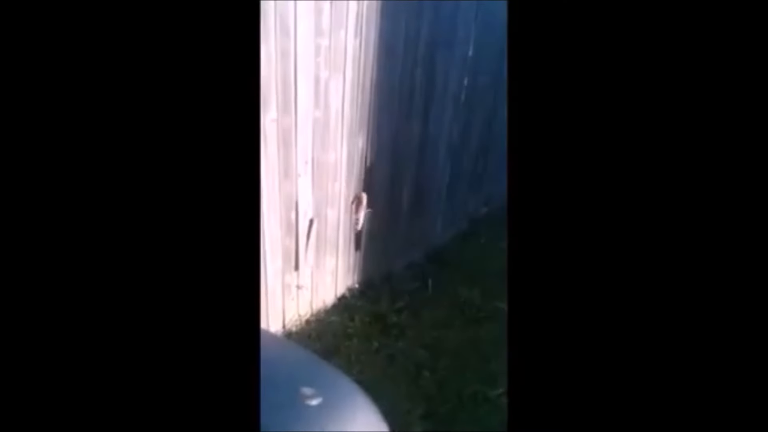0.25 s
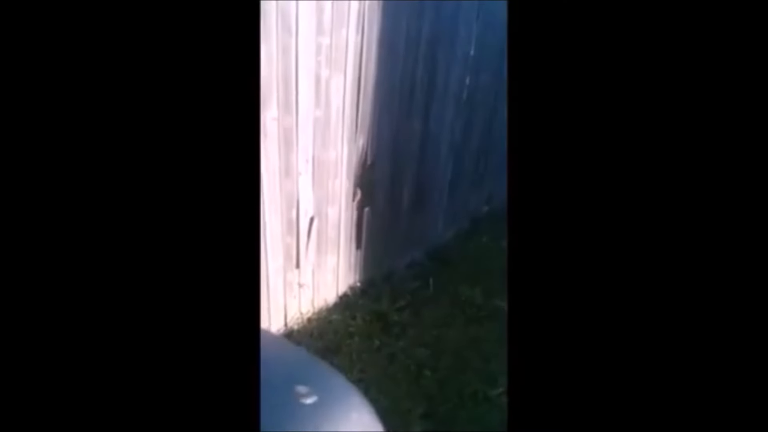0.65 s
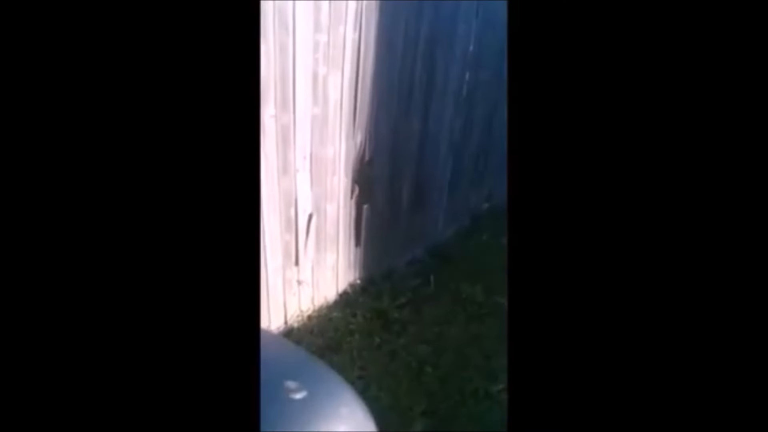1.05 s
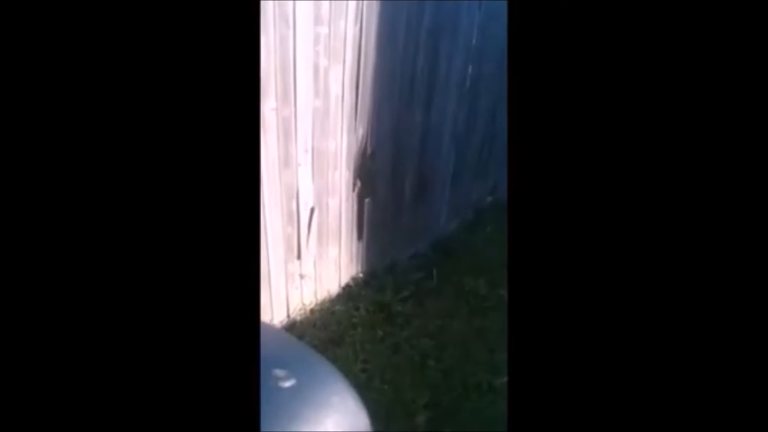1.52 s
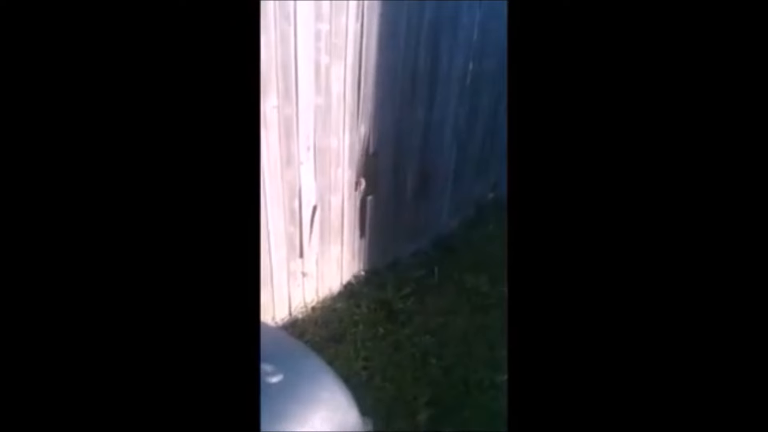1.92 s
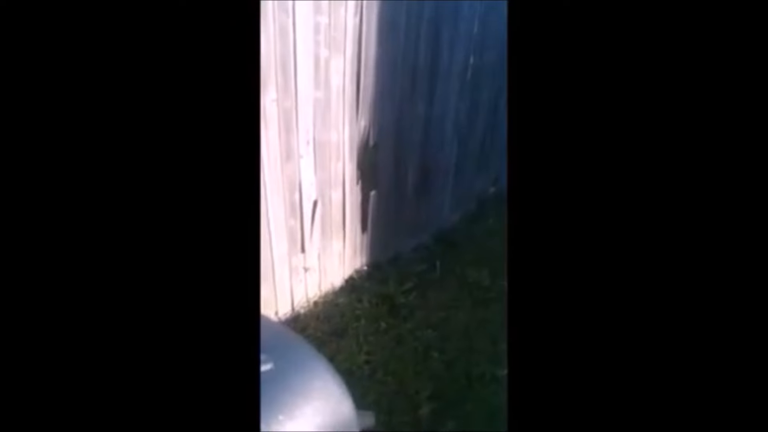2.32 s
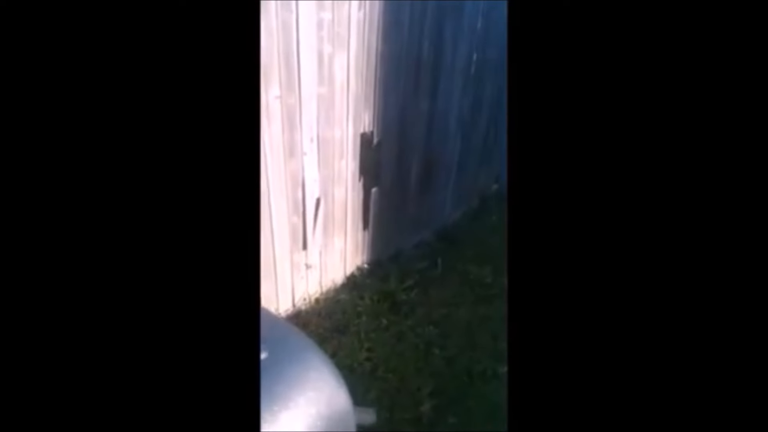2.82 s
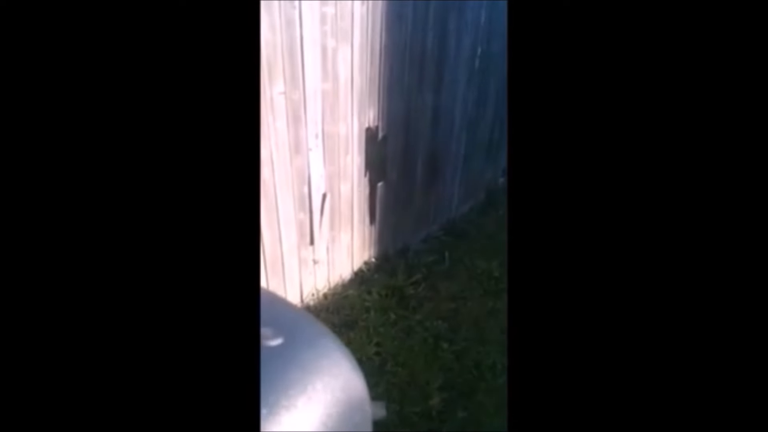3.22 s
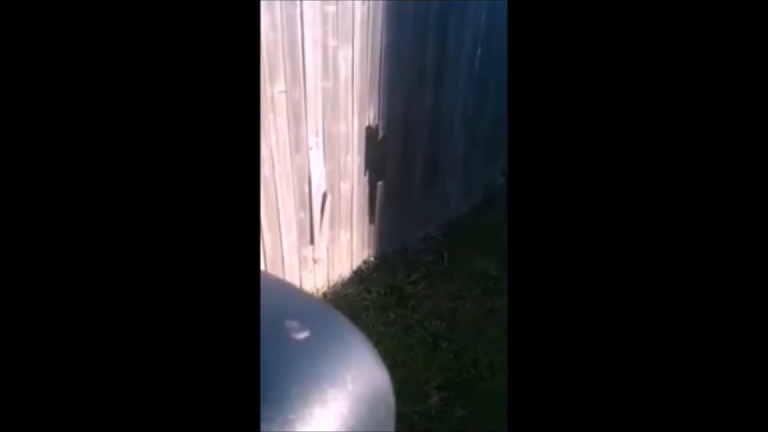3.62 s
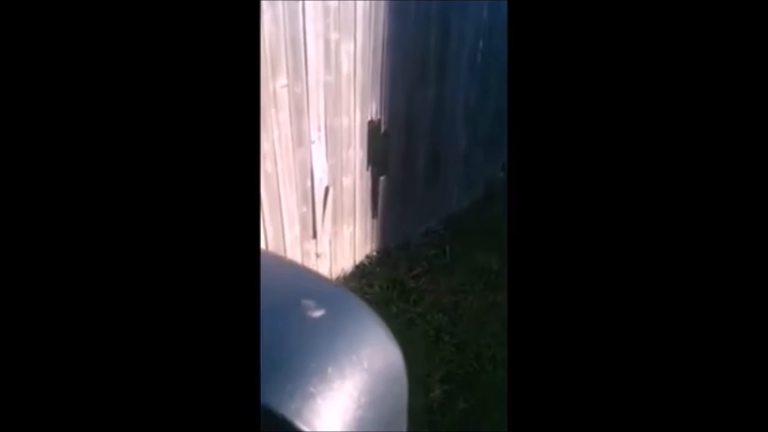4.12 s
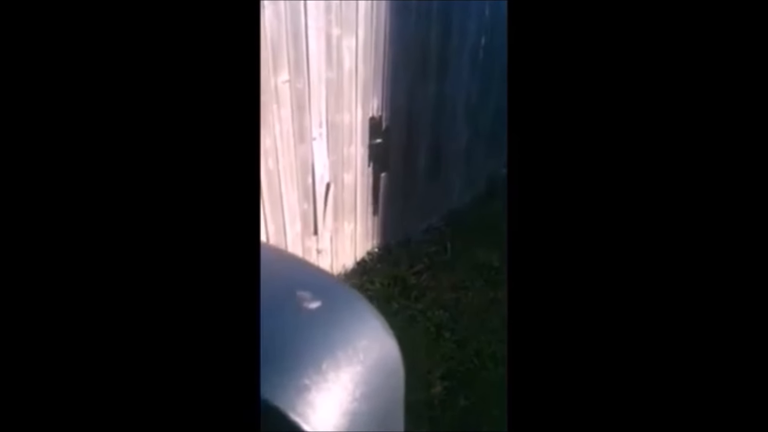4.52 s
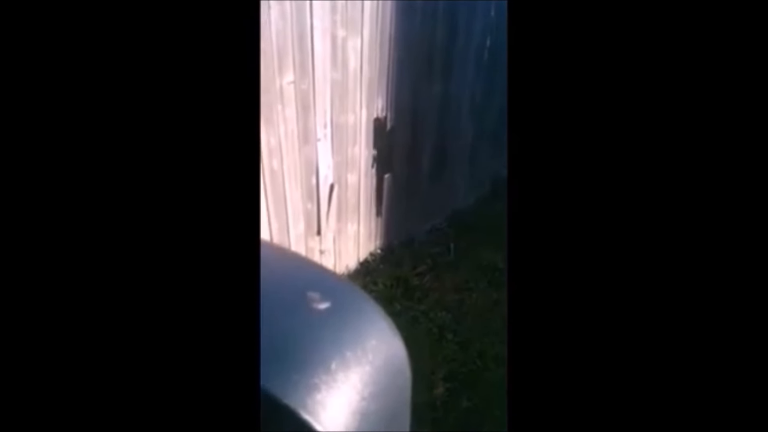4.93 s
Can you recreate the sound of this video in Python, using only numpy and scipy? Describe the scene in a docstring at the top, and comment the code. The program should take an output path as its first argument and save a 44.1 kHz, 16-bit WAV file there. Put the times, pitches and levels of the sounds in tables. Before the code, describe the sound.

A handheld microphone outdoors catches dull handling bumps, then a rapid burst of bright metal clicks on a ringing hollow body. Sparse taps lead to a heavier double knock and a sudden loud blast, like an air gun, with a short dense tail. Afterwards come low knocks, grainy metal slides, a lull and a final click with rustle, over steady dull hiss and faint rumble.

```python
"""Clicks, knocks and a bang in a yard

Beside a wooden fence, small metal parts click and scrape, and a hollow body is knocked about close by.
One loud bang, perhaps an air gun, is followed by more knocks. Each blow is a short burst of shaped noise.
Narrow filters make the hollow body ring, and a dense tail of fading noise follows each close sound.
Underneath are dull hiss, an uneven low rumble and one faint peep, a fading sine wave."""
import sys
import numpy as np
from scipy import signal
from scipy.fft import irfft
from scipy.io import wavfile

SR = 44100
rng = np.random.default_rng(int(sys.argv[2]) if len(sys.argv) > 2 else 0)


def output_pcm(signal):
    """Save a mono or channel-first signal as 16-bit PCM at the path in sys.argv[1].

    Samples are clipped to [-1, 1] before scaling.
    """
    pcm = np.clip(np.atleast_2d(signal).T, -1, 1) * 32767
    wavfile.write(sys.argv[1], SR, np.round(pcm).astype(np.int16))


N = 227464  # length in samples


def amp(db):
    """Turns decibels into a plain multiplier."""
    return 10 ** (np.asarray(db) / 20)


def evened(x):
    """Scales a sound to an average strength (RMS) of one."""
    return x / np.sqrt(np.mean(x ** 2) + 1e-20)


def read(points, hz):
    """Reads a (frequency, value) table between its points, on a log-frequency axis."""
    f, value = np.transpose(points)
    return np.interp(np.log(hz + 1), np.log(f + 1), value)


def level(rows):
    """Turns a (time, level) table into a multiplier for every sample."""
    return amp(np.interp(np.arange(N) / SR, *np.transpose(rows)))


def add(mix, s, sound):
    """Lays a sound into the mix at s seconds."""
    part = mix[max(round(s * SR), 0):][:len(sound)]
    part += sound[:len(part)]


def noise(colour, size):
    """Noise of unit strength: random phases, with the spectrum colour(Hz) in dB."""
    hz = np.fft.rfftfreq(size, 1 / SR)
    phases = np.exp(2j * np.pi * rng.random(len(hz)))
    return evened(irfft(amp(colour(hz)) * phases, size))


def lumps(rate_hz, size):
    """A random curve of unit strength that wanders mostly slower than rate_hz."""
    return noise(lambda f: -40 * np.log10(1 + (f / rate_hz) ** 2), size)


def uneven(spacing_hz, depth_db):
    """The random peaks and dips of a part with many crowded resonances: (frequency [Hz], level [dB])."""
    hz = np.arange(0, SR / 2, spacing_hz)
    return np.c_[hz, depth_db * rng.standard_normal(size=4096)[:len(hz)]]


def hump(hz, centre_hz, below, above, depth_db):
    """A bell-shaped colour with its own spread [octaves] on each side, levelling off far out."""
    octaves = np.log2((hz + 1) / centre_hz)
    spread = np.where(octaves < 0, below, above)
    drop_db = 10 / np.log(10) * (octaves / spread) ** 2
    return -depth_db * np.tanh(drop_db / depth_db)


def fade(x, ring, gain=((1, 0), (2, 0))):
    """Lets every band of x die at its own speed; t60 is the time to drop by 60 dB."""
    hz, t, z = signal.stft(x, SR, nperseg=256)
    fading_db = -60 * t / read(ring, hz)[:, None]
    z = z * amp(read(gain, hz)[:, None] + fading_db)
    return signal.istft(z, SR, nperseg=256)[1][:len(x)]


def blow(colour, rise, t60, chatter_db=0, size=16384):
    """Many resonances struck at once: noise that swells, then dies, chattering if the contact is loose."""
    t = np.arange(size) / SR
    envelope = np.minimum(t / rise, 1) * amp(-60 * np.maximum(t - rise, 0) / t60)
    chatter = amp(chatter_db * lumps(170.1, size))
    sound = noise(colour, size) * envelope * chatter
    return sound * np.linalg.norm(envelope) / np.linalg.norm(sound)  # chatter keeps the total energy


# colour of the background hiss: (frequency [Hz], relative level per Hz [dB])
HISS_COLOUR = [(100, -11), (200, -0.5), (340, -0.5), (430, -5.5), (520, -13.5), (650, 1), (770, -10.5),
               (950, -4), (1400, -8.5), (1850, -11.5), (2450, -32.5), (3200, -43), (6000, -34.5),
               (15000, -60)]
# rise and fall of the hiss: (time [s], relative level [dB])
HISS_LEVEL = [(0, -51), (.9, -47.5), (1.2, -53), (1.8, -49), (3.5, -47.5), (3.9, -52), (5.15, -46.5)]
# colour of the low rumble: (frequency [Hz], relative level per Hz [dB])
RUMBLE_COLOUR = [(20, -19), (40, -3.5), (60, 6), (120, -2), (200, -5), (320, -27.5), (700, -46)]
# rise and fall of the rumble: (time [s], relative level [dB])
RUMBLE_LEVEL = [(0.0, -46.5), (1.28, -57.5), (1.88, -45.5), (2.27, -60.5), (2.77, -39.5), (3.24, -57),
                (3.53, -53.5), (4.17, -50), (4.35, -54.5), (5.15, -51)]
RUMBLE_TRIM_DB, SELF_NOISE_DB = 3, -78


def outdoors():
    """Dull background hiss, a low rumble that comes in lumps, and the microphone's own steady noise."""
    hiss_colour = lambda f: read(HISS_COLOUR, f) - 10 * np.log10(1 + (170 / (f + 1)) ** 4)
    rumble_colour = lambda f: read(RUMBLE_COLOUR, f) - 30 * np.log10(1 + (f / 1500) ** 2)
    hiss = amp(-2.0) * noise(hiss_colour, size=N) * level(HISS_LEVEL)
    lumpy_gain = amp(RUMBLE_TRIM_DB + 2.0 * lumps(22, N))
    rumble = noise(rumble_colour, size=N) * level(RUMBLE_LEVEL) * lumpy_gain
    own_noise = amp(SELF_NOISE_DB) * rng.standard_normal(N)
    return hiss + rumble + own_noise


# an ordinary knock: softer ones swell more slowly, lower ones are narrower in pitch
KNOCK_DB, KNOCK_RISE_S, KNOCK_DB_PER_HALVING = -28.5, 0.0033, 18
KNOCK_HZ, KNOCK_OCTAVES, KNOCK_WIDENING = 700, 0.81, 0.32


def knock(db, hz, t60):
    """A dull contact: noise gathered around one pitch, swelling more slowly when the blow is softer."""
    rise = KNOCK_RISE_S * 2 ** ((KNOCK_DB - db) / KNOCK_DB_PER_HALVING)
    spread = KNOCK_OCTAVES * (hz / KNOCK_HZ) ** KNOCK_WIDENING
    # extra colour: (frequency [Hz], level [dB])
    softness = [(1900, -2), (2600, -14.0), (4000, -1.0), (9000, -15), (15000, -31.5)]
    colour = lambda f: hump(f, hz, spread, spread, depth_db=36.5) + read(softness, f)
    return amp(db) * blow(colour, rise, t60, chatter_db=2.0)


# dull knocks: (time [s], relative level [dB], centre frequency [Hz], ring t60 [s])
DULL_KNOCKS = [ (.0, -39, 500, 0.42), (0.025, -37, 189, 0.23), (.175, -42.5, 570, 0.18),
               (0.357, -41, 165, 0.083), (0.4526, -23.5, 596, 0.055), (0.487, -38.5, 736, 0.029),
               (0.544, -43.5, 472, 0.19), (.635, -30.5, 1620, 0.038), (.7673, -31.5, 1450, 0.04),
               (0.774, -40, 219, 0.038), (0.86, -31.5, 1320, 0.086), (1.533, -40, 750, 0.18),
               (1.98, -30.5, 196, 0.065), (2.088, -33.5, 260, 0.085), (2.093, -40.5, 650, 0.19),
               (2.126, -34.5, 1450, 0.059), (2.236, -38.5, 1460, 0.14), (2.418, -21, 710, 0.1),
               (2.431, -33.5, 185, 0.21), (2.432, -25, 1320, 0.058), (2.709, -7.5, 1450, 0.054),
               (2.745, -21, 137.5, 0.14), (2.763, -13, 1210, 0.057), (2.797, -17.5, 820, 0.27),
               (2.846, -21.5, 965, 0.068), (2.913, -18.5, 653, 0.092), (2.94, -20, 770, 0.21),
               (3.057, -36.5, 570, 0.11), (3.143, -40.5, 544, 0.25), (3.172, -32, 812, 0.19),
               (3.289, -36.5, 421.4, .12), (3.362, -24, 1360, 0.064), (3.637, -40, 895, 0.068),
               (3.784, -46, 550, .085), (4.161, -47.5, 446, 0.11), (4.239, -48, 446.4, .16),
               (4.769, -31, 1450, 0.17), (4.817, -40, 673, 0.5), (4.904, -39, 1470, 0.042),
               (4.96, -39, 414, 0.095), (5.05, -42.5, 900, 0.5), (5.088, -33, 1080, 0.11)]
BUMPS_PER_S, BUMPS_DB = 3.3, -54.5  # the level of the weakest bumps


def knocks():
    """The clear knocks, and faint bumps of handling at random times."""
    out = np.zeros(N)
    for s, *row in DULL_KNOCKS:
        add(out, s, knock(*row))
    for when, strength, pitch in rng.random((int(BUMPS_PER_S * N / SR), 3)):
        bump = knock(BUMPS_DB + 7 * strength, 330 + 400 * pitch, t60=0.015)
        add(out, when * N / SR, bump)
    return out


# the hollow body's resonances: (frequency [Hz], width [Hz], relative level [dB])
BODY_RESONANCES = [(105.9, 31, 5.5), (132.5, 13, 2.5), (195, 34, 4), (255.6, 25, 0), (407.8, 44, 9),
                   (620, 36, 8), (886, 44, -3), (1049, 4.3, -3), (1223, 60, 5), (1810, 4.8, -6),
                   (1876, 21, 1), (2018, 27, 2), (3530, 61, -11), (6285, 77, -6.5)]


def body(x):
    """Every blow also sets the hollow body ringing, through one narrow filter per resonance."""
    rings = np.zeros(N)
    for hz, width, db in BODY_RESONANCES:
        resonance = signal.iirpeak(hz, hz / width, SR)
        rings += amp(db) * signal.lfilter(*resonance, x)
    return x + amp(-1.0) * rings


# how long the tail lasts: (frequency [Hz], t60 [s])
TAIL_FADING = [(100, 2), (500, 0.44), (1500, 0.71), (3000, 0.71), (5000, 0.9249), (8000, 0.19),
               (15000, 0.94)]
# how strong the tail is: (frequency [Hz], relative level [dB])
TAIL_STRENGTH = [(100, -8.5), (500, -9.5), (1500, -14.5), (2800, -13.5), (5000, -19.5), (8000, -19.5),
                 (15000, -24)]


def tail(x):
    """A dense noise tail after every close sound, each band fading at its own speed."""
    t = np.arange(SR) / SR
    flat_noise = noise(lambda f: 0 * f, size=SR)
    swelling_noise = flat_noise * np.minimum(t / 0.0017, 1) / np.sqrt(0.058 * SR)
    return signal.fftconvolve(x, fade(swelling_noise, TAIL_FADING, TAIL_STRENGTH))[:N]


# one faint high peep: (time [s], relative level [dB], frequency [Hz], t60 [s])
HIGH_PEEP = (.118, -63, 2927, .18)


def peep():
    """A thin sine tone that swells quickly and dies."""
    s, db, hz, t60 = HIGH_PEEP
    t, out = np.arange(SR // 4) / SR, np.zeros(N)
    envelope = amp(db - 60 * t / t60) * np.minimum(t / 0.0025, 1)
    add(out, s, envelope * np.sin(2 * np.pi * hz * t))
    return out


# sharp metal clicks: (time [s], relative level [dB], snap t60 [s])
METAL_CLICKS = [ (0.367, -50, 0.015), (.456, -42, 0.029), (0.5843, -13.5, 0.0066), (0.5958, -15.5, 0.0082),
                (0.631, -13.5, .0036), (0.6346, -10.5, 0.011), (0.636, -19, 0.031), (.691, -16, 0.0086),
                (0.726, -7.5, 0.0034), (.765, -27.5, 0.05), (.858, -24, 0.096), (1.386, -37.5, 0.019),
                (1.403, -53, 0.023), (1.494, -53, 0.016), (1.9517, -34.5, 0.018), (2.061, -42.5, 0.046),
                (2.094, -38, 0.0059), (2.1258, -23, 0.011), (2.237, -31.5, 0.052), (2.3978, -37, 0.0068),
                (2.4158, -20.5, 0.048), (2.433, -29.5, 0.036), (2.5808, -37.5, 0.016),
                (2.615, -34.5, 0.015), (2.678, -40, 0.034), (2.911, -34, 0.033), (3.0332, -38.5, 0.053),
                (3.182, -41, 0.067), (4.049, -37, 0.028), (4.485, -50, .035), (4.591, -49, .036),
                (4.614, -46, 0.058), (4.7708, -20, 0.0578), (4.836, -41, 0.1)]
# colour of a snap: (multiple of its centre frequency, relative level [dB])
SNAP_COLOUR = [(.02, -49.5), (.15, -37), (.4, -25.5), (.7, -3), (1, 2.5), (1.3, -8), (1.8, -12.5), (3, -18)]
# an ordinary click, and how a harder one sounds brighter and rings on more strongly
CLICK_DB, CLICK_HZ, CLICK_DB_PER_OCTAVE = -37.5, 5946, 41.5
LINGER_DB, LINGER_SLOPE, LINGER_HZ = -58.5, 0.46, 5400
# loose parts settle: the longest rebound delay, and the rebound level against the lingering ring
SETTLE_S, SETTLE_DB = 0.1, 3


def clicks():
    """Hard contacts, brighter when harder: a snap, a tinkle, two small rebounds and a faint ring."""
    out, parts = np.zeros(N), uneven(spacing_hz=170, depth_db=2)
    linger = lambda f: hump(f, LINGER_HZ, below=.6, above=.36, depth_db=23.5) + read(parts, f)
    for s, db, t60 in METAL_CLICKS:
        hz = CLICK_HZ * 2 ** ((db - CLICK_DB) / CLICK_DB_PER_OCTAVE)
        linger_db = LINGER_DB + LINGER_SLOPE * (db - CLICK_DB)
        spot = uneven(spacing_hz=450, depth_db=3.5)  # each point of contact favours other resonances
        metal = lambda f: read(parts, f) + read(spot, f)
        snap = lambda f: read(np.multiply(SNAP_COLOUR, (hz, 1)), f) + metal(f)
        tinkle = lambda f: hump(f, hz, below=0.78, above=0.7 * hz / 6500, depth_db=38.5) + metal(f)
        rise = .04 * t60  # longer clicks swell in more slowly
        add(out, s - rise / 2, amp(db) * blow(snap, rise, t60))
        add(out, s, amp(db - 19.5) * blow(tinkle, rise=0.0025, t60=0.12, chatter_db=3.5))
        add(out, s, amp(linger_db) * blow(linger, rise=0.0043, t60=0.3, chatter_db=1.0))
        for late in rng.random(size=2):
            rebound = blow(snap, rise=0.0004, t60=.012, size=2048)
            add(out, s + late * SETTLE_S, amp(linger_db + SETTLE_DB) * rebound)
    return out


# metal parts sliding: (time [s], relative level [dB], centre frequency [Hz], rise [s], t60 [s])
METAL_SCRAPES = [(1.536, -66, 3730, 0.0056, 0.2), (1.955, -56, 5090, 0.004, 1),
                 (3.04, -47, 4750, 0.0078, 0.31), (3.363, -36, 3080, 0.0036, 0.073),
                 (3.367, -42, 4650, 0.021, 0.25), (3.638, -51, 3500, 0.011, 0.23),
                 (4.05, -56.5, 5200, 0.0028, 0.16), (4.775, -41, 5900, .006, 0.4),
                 (5.03, -45, 4800, .065, 0.14)]


def scrapes():
    """Metal slides over metal: a grainy rustle that swells and dies away."""
    out = np.zeros(N)
    for s, db, hz, rise, t60 in METAL_SCRAPES:
        colour = lambda f: hump(f, hz, below=0.43, above=0.35, depth_db=32.5)
        add(out, s, amp(db) * blow(colour, rise, t60, chatter_db=3.5))
    return out


# the bang's colour: (frequency [Hz], relative level per Hz [dB])
BANG_COLOUR = [(30, -30.5), (70, -12.5), (130, -2.5), (280, -4), (600, -5), (1200, -1), (2000, 0.5),
               (2600, -10), (4000, -7), (6000, -3.5), (8500, -4), (12000, -4), (15000, -12)]
# how fast the bang dies: (frequency [Hz], t60 [s])
BANG_FADING = [(100, 0.51), (400, 0.65), (1200, 0.16), (2500, 0.4), (5000, 0.36), (9000, 0.28),
               (15000, 0.19)]
BANG_S, BANG_DB, BANG_RISE_S = 2.7013, -6, 0.0012
CRACK_DB, CRACK_T60_S = -9, .03
RATTLE_DB, RATTLE_BUILD_S = 3, .12  # the blast starts solid and breaks up into rattling
FENCE_DELAY_S, FENCE_DB = .058, -19.5


def bang():
    """A bright crack on a broad, rattling blast whose bands die at their own speeds; the fence echoes once."""
    t, parts = np.arange(SR) / SR, uneven(spacing_hz=70, depth_db=2)
    blast_noise = noise(lambda f: read(BANG_COLOUR, f) + read(parts, f), size=SR)
    blast = fade(blast_noise, BANG_FADING) * np.minimum(t / BANG_RISE_S, 1)
    rattle = amp(RATTLE_DB * np.minimum(t / RATTLE_BUILD_S, 1) * lumps(260, SR))
    crack_colour = lambda f: hump(f, 7800, below=.6, above=.55, depth_db=26)
    crack = blow(crack_colour, rise=.0004, t60=CRACK_T60_S)
    thrown_back = blow(lambda f: read(BANG_COLOUR, f), rise=0.012, t60=0.11, chatter_db=-2.5)
    out = np.zeros(N)
    add(out, BANG_S, amp(BANG_DB) * blast * rattle)
    add(out, BANG_S, amp(CRACK_DB) * crack)
    add(out, BANG_S + FENCE_DELAY_S, amp(FENCE_DB) * thrown_back)
    return out


def scene():
    """The close sounds, their noise tail, and the outdoor background."""
    near = body(knocks() + clicks() + scrapes() + bang()) + peep()
    return (amp(-2.5) * near + tail(near) + outdoors())[None]


EDGE_HZ = 15150  # upper limit of the sound


def record(dry):
    """Rounds off the loudest peaks, then removes the highest treble."""
    rounded = dry / (1 + (dry / .9) ** 4) ** .25
    low_pass = signal.firwin(401, EDGE_HZ, window=("kaiser", 8), fs=SR)
    return signal.oaconvolve(rounded, low_pass[None], "same")


dry = scene()
out = record(dry)
output_pcm(out)
```